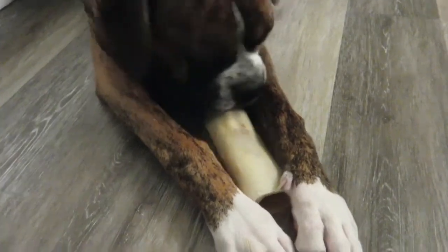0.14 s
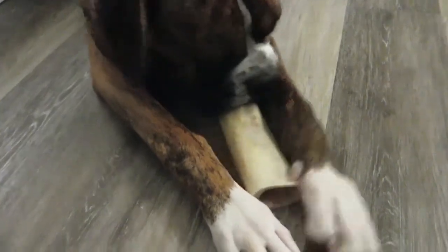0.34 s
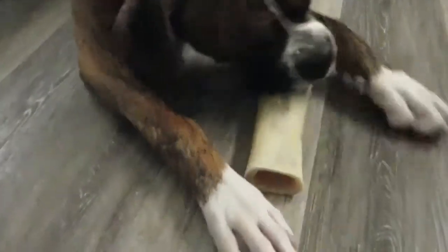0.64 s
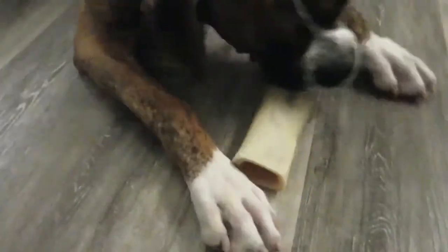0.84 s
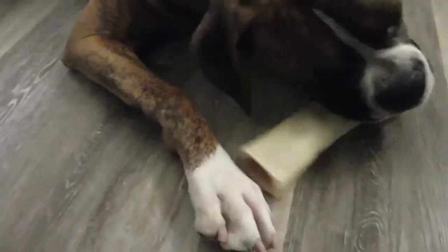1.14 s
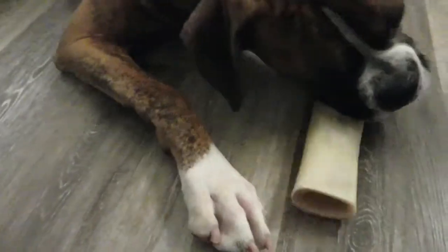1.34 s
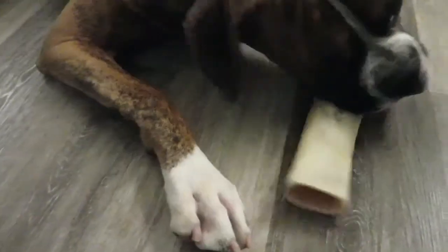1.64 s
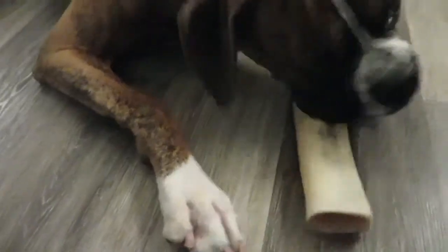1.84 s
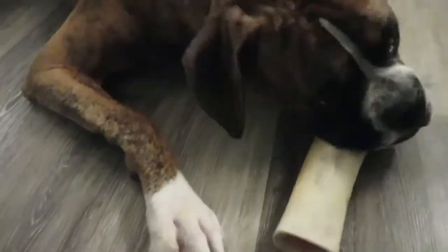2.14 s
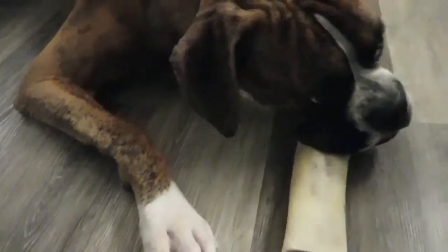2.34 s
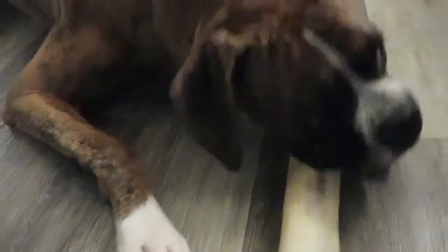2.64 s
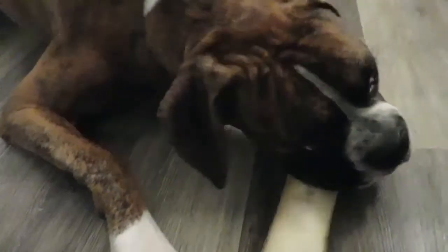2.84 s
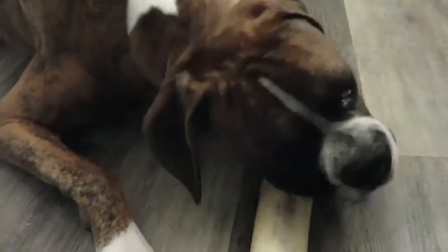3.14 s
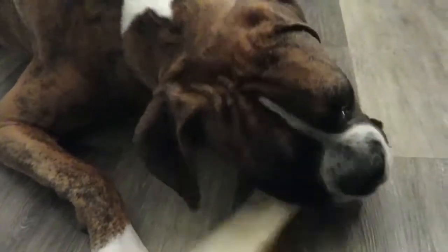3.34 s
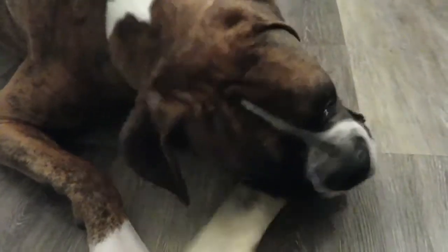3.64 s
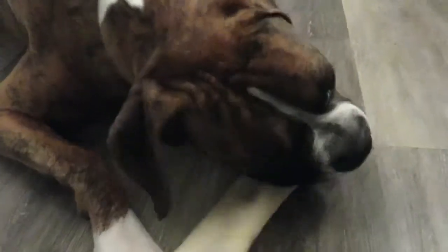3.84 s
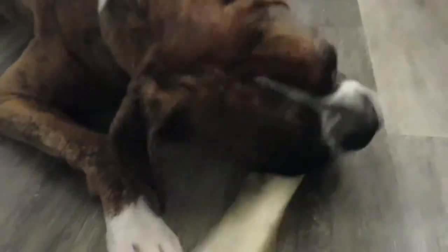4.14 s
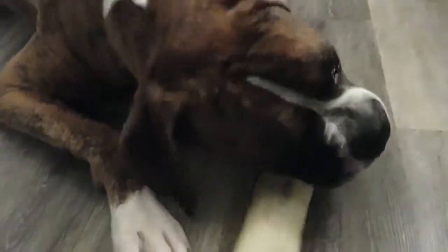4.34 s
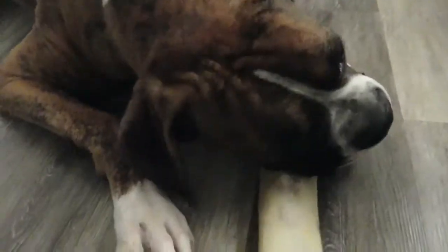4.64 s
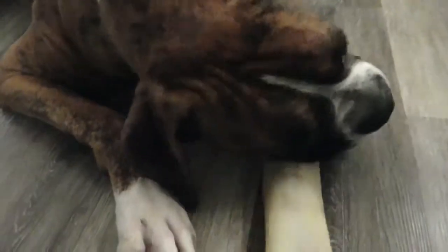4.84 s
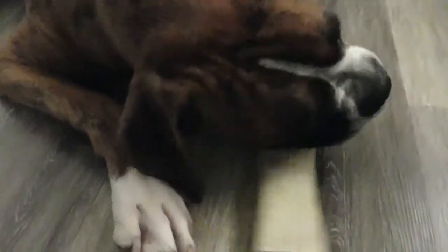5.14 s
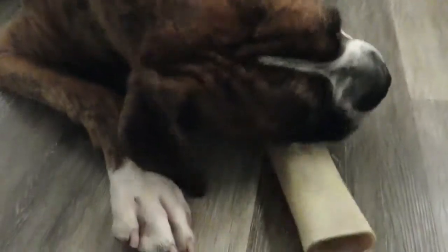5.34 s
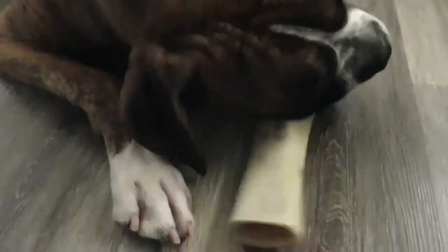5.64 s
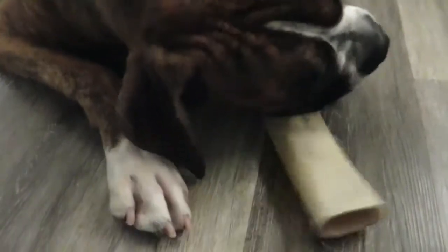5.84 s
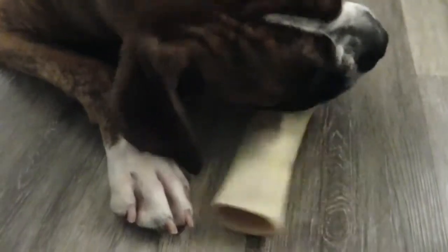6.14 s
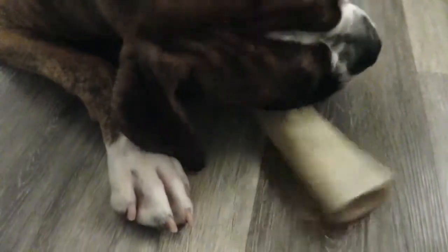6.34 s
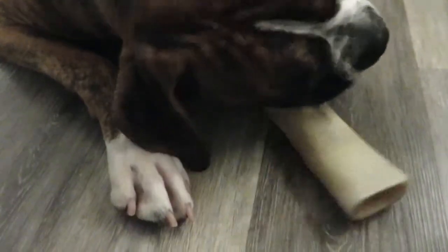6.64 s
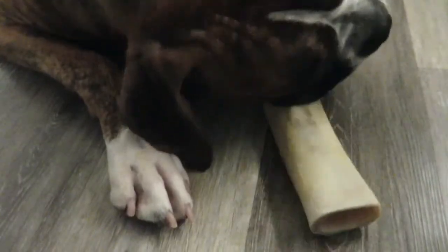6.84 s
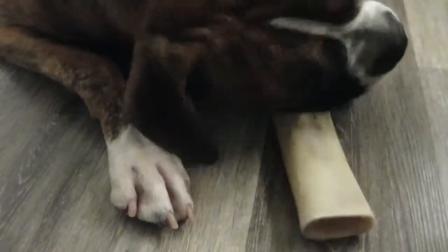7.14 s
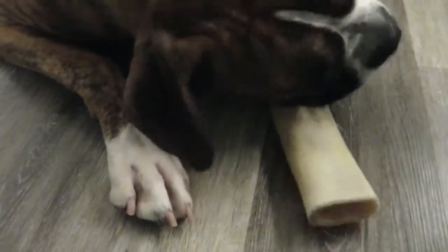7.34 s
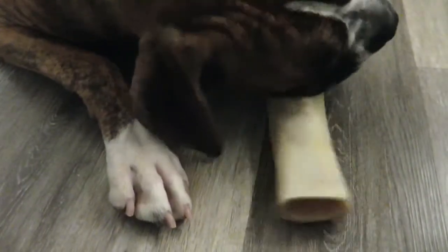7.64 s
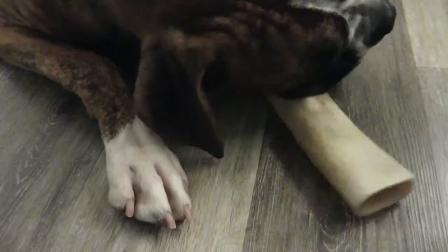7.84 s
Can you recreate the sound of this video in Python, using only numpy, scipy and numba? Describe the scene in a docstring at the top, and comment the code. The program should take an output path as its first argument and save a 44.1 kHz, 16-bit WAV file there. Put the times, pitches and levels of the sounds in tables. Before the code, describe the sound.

Irregular hollow bone knocks, sharp tooth clicks and short gritty skids as a dog chews, with faint floor thumps and soft room hiss.

```python
"""First a soft hum and hiss, a paw brushing and a low grind; at once a dog's teeth skid and knock on bone.
The place is a small room with a hard floor; the microphone is a phone with two ports, close to the bone.
Knocks make the hollow bone's air column hoot and the boards thump; cracks and snaps ring its wall.
Skids and grinding drive the same resonances with random slips. The room adds echoes and a short tail."""
import sys
import numpy as np
from scipy import signal
from scipy.io import wavfile
from scipy.ndimage import uniform_filter1d
from numba import njit

SR = 44100
rng = np.random.default_rng(int(sys.argv[2]) if len(sys.argv) > 2 else 0)


def transcribe(signal):
    """Save signal, clipped to [-1, 1], as a 16-bit WAV file at the path in sys.argv[1]."""
    frames = np.atleast_2d(signal).T
    limited = np.clip(frames, -1, 1)
    pcm = np.round(limited * 32767).astype(np.int16)
    wavfile.write(sys.argv[1], SR, pcm)


N = 351918
LEFT_RIGHT = np.array([[1], [-1]])  # sign of a side signal at the two ports


def undb(db):
    """dB to gain."""
    return 10 ** (np.asarray(db) / 20)


def unit(x):
    """Scale to rms 1."""
    return x / np.sqrt(np.mean(x ** 2))


def peak(x, db):
    """Scale to a peak level."""
    return x * undb(db) / np.abs(x).max()


def band(x, hz, width):
    """One fixed resonance, gain 1 at its centre."""
    return signal.lfilter(*signal.iirpeak(hz, hz / width, fs=SR), x)


def body(x, modes, tilt_db=0):
    """Sum of resonances with alternate signs; tilt_db shifts the level of each mode."""
    tilts = tilt_db + np.zeros(len(modes))
    total = 0
    for k, ((hz, width, db), tilt) in enumerate(zip(modes, tilts)):
        total = total + (-1) ** k * undb(db + tilt) * band(x, hz, width)
    return total


@njit
def svf(x, hz, width):
    """State-variable band-pass with a moving centre, gain 1 at the centre."""
    y, band_state, low_state = np.empty(len(x)), 0., 0.
    for i in range(len(x)):
        g, k = np.tan(np.pi * hz[i] / SR), width / hz[i]
        v = (band_state + g * (x[i] + 1e-18 - low_state)) / (1 + g * (g + k))
        band_state, low_state = 2 * v - band_state, low_state + 2 * g * v
        y[i] = k * v
    return y


@njit
def follow(x, attack, release):
    """Envelope with quick rise and slow fall; both are fractions per sample."""
    e, out = 0., np.empty(len(x))
    for i in range(len(x)):
        e += (x[i] - e) * (attack if x[i] > e else release)
        out[i] = e
    return out


def walk(rate):
    """Random levels held 1 / rate s and slewed; rms 1."""
    hold = int(SR / rate)
    steps = np.repeat(rng.standard_normal(N // hold + 1), hold)
    return unit(uniform_filter1d(steps, hold)[:N])


def curves(table):
    """Columns of a table after its times, drawn as straight lines sample by sample."""
    s, *columns = np.transpose(table)
    return [np.interp(np.arange(N) / SR, s, c) for c in columns]


def slips(rate, spread_db, patchy_db):
    """Stick-slip: random clicks of very uneven size that come in patches; rate is clicks per s."""
    hit = rng.random(N) < rate / SR
    uneven_db = spread_db * np.minimum(rng.exponential(size=N), 4)
    return hit * rng.standard_normal(N) * undb(uneven_db + patchy_db * walk(40))


# spectrum of the quiet place: (f/Hz, relative density level/dB)
AIR_SPECTRUM = [(15, -44), (25, -7), (97, 13.5), (141, -1.5), (363, -1.5), (489, -6), (676, -10),
                (1360, -3.5), (1600, -18), (3810, -11), (4250, -1.5), (11500, -44.5), (14300, -42),
                (16000, -51.5)]
# side level of the hum and hiss by band: (f/Hz, side minus mid level/dB)
AIR_SIDE_LEVEL = [(30, -18.5), (60, -20), (250, 8.5), (1500, -3), (4500, -29), (12000, -15)]
AIR_DB = -54.5  # rms level


def air():
    """House hum and microphone hiss: noise bands two thirds of an octave apart that waver a little."""
    def level_at(table, hz):
        f, db = np.transpose(table)
        return np.interp(np.log(hz), np.log(f), db)

    out, swell = 0, walk(1.564)
    for hz in 35 * 2 ** (np.arange(14) * 2 / 3):
        noise = rng.standard_normal((2, N))
        mid, side = band(band(noise, hz, hz * 0.68), hz, hz * 0.68)
        level = undb(level_at(AIR_SPECTRUM, hz) + 2.0 * swell + 0.78 * walk(6.4))
        out = out + level * (mid + undb(level_at(AIR_SIDE_LEVEL, hz)) * side * LEFT_RIGHT)
    return undb(AIR_DB) * unit(out)


# paw and fur brushing the floor, most as the paw sweeps round: (t/s, level/dB)
BRUSH_LEVEL = [(0, -76), (.75, -64.5), (1.3, -71), (1.55, -91), (1.9, -73), (4.25, -69), (4.5, -70.5),
               (7.98, -73)]


def brush():
    """Paw pads and fur sliding on the floor: many small slips make a wide soft hiss."""
    grains = np.array([slips(9000, spread_db=1.5, patchy_db=1.5) for _ in range(2)])
    mid, side = unit(band(band(grains, 6900, 11000), 7000, 10000))
    return undb(curves(BRUSH_LEVEL)[0]) * (mid + undb(-22.5) * side * LEFT_RIGHT)


# bone modes heard in a crack: (f/Hz, width/Hz, level/dB)
CRACK_MODES = [(1000, 257, 6), (1675, 350, 4.5), (2100, 302, 5), (2710, 654, 5), (3440, 1370, 0.5),
               (5640, 1260, -6.5)]
# ringing modes of the bone wall: (f/Hz, width/Hz, level/dB)
WALL_MODES = [(4201, 116, 7), (5336, 80, -4.5), (6500, 420, -5.5), (7600, 130, -11), (8260, 930, -11.5)]
# modes of the floor boards: (f/Hz, width/Hz, level/dB)
BOARD_MODES = [(92.4, 56, -3.5), (217.7, 116, 2), (394.6, 65, 6.5)]
# steady rubbing of teeth on bone and bone on floor:
# (t/s, grit level/dB, hollow level/dB, hollow f/Hz, floor rumble level/dB)
RUBBING = [(0.0, -56, -54.5, 820, -57), (0.31, -60.5, -56, 564, -63), (0.75, -56.5, -55, 615, -58),
           (1.3, -56.5, -53.5, 725, -53), (1.5, -56, -44, 760, -74), (1.85, -63, -58.5, 690, -57.5),
           (2.16, -54.5, -64, 600, -57), (2.63, -64, -74, 649, -62), (2.9, -54, -39, 633, -53.5),
           (3.25, -59, -70.5, 694, -66), (3.43, -55.5, -42, 663, -52.5), (4.1, -57, -48, 640, -45),
           (4.45, -56, -40, 623, -47), (4.75, -60.5, -65, 696, -64.5), (5.04, -57, -51.5, 692, -55.5),
           (5.5, -63.5, -55.5, 680, -54), (6.1, -55.5, -45, 770, -52), (6.7, -62.5, -61, 790, -55),
           (7.98, -63, -58, 690, -58.5)]
RUB_WALL_DB = -10.5  # wall ring relative to the grit


def grind():
    """Rubbing drives the wall, air column and floor boards with dense small slips."""
    grit_db, hollow_db, hollow_hz, rumble_db = curves(RUBBING)
    fine = slips(3000, spread_db=2.5, patchy_db=2.5)
    coarse = slips(600, spread_db=2.0, patchy_db=2.5)
    grit = unit(body(fine, CRACK_MODES))
    wall = unit(body(fine, WALL_MODES, tilt_db=np.array([-3.5, -7, 4.5, 0, -3.0])))
    hollow = unit(svf(svf(coarse, hollow_hz, 160.0), hollow_hz, 330.0))
    rumble = unit(body(coarse, BOARD_MODES))
    out = undb(grit_db) * (grit + undb(RUB_WALL_DB) * wall)
    return out + undb(hollow_db) * hollow + undb(rumble_db) * rumble


# a tooth skidding along the wall, rms levels before its swell and fade:
# (t/s, length/s, grit level/dB, hollow level/dB, wall ring level/dB, squeak f/Hz)
SKID_EVENTS = [(0.014, 0.046, -63, -48, -77, 6500), (0.44, 0.19, -49, -72, -57, 5370),
               (0.854, 0.22, -52, -83, -55, 5500), (1.126, 0.056, -39, -32.5, -46, 6660),
               (1.2, 0.12, -50, -50, -52, 5320), (1.362, .2, -60, -60, -68, 5300),
               (1.988, 0.051, -47.5, -48.5, -64, 6550), (2.571, 0.1, -54.5, -54, -58, 5070),
               (2.765, 0.044, -31, -56, -48, 6500), (2.917, 0.045, -52, -52, -43, 5450),
               (3, 0.039, -49, -64, -53, 5800), (3.434, 0.052, -52, -40, -44.5, 5150),
               (3.646, 0.063, -59, -42.5, -70, 6000), (3.723, 0.07, -51, -47, -52, 5330),
               (3.783, 0.07, -48, -36.5, -61, 6260), (4.048, .06, -50, -46, -53, 6250),
               (4.189, 0.074, -39, -40, -46, 7200), (4.317, 0.091, -37, -35, -45, 7250),
               (4.41, 0.062, -47, -38, -60, 5400), (4.549, 0.046, -33.5, -39, -45, 5650),
               (4.926, 0.052, -48, -51, -55, 6230), (5.002, 0.035, -44, -41, -43.5, 6100),
               (5.141, 0.038, -75, -41.5, -68, 6400), (5.294, 0.062, -59.5, -45.5, -68, 6240),
               (5.5, 0.12, -63, -40.5, -73, 5600), (5.599, 0.094, -44.5, -38, -59, 6370),
               (5.75, 0.051, -54, -34.5, -71, 5300), (5.796, 0.057, -54, -44.5, -63, 6300),
               (6.018, 0.077, -41, -38.5, -42.5, 6000), (6.354, 0.1, -57, -39, -50, 6130),
               (6.753, 0.19, -78, -51.5, -61, 6340), (7.079, 0.1, -67, -41, -63, 6300),
               (7.326, 0.044, -59, -45.5, -72, 6250), (7.521, 0.086, -74, -39, -57, 6600),
               (7.674, 0.053, -73, -50.5, -61, 6400), (7.842, 0.068, -72, -47, -55.5, 6300)]
# bites that knock the bone; hollow f/Hz is set by how far the jaws cover the end:
# (t/s, hollow peak level/dB, hollow f/Hz, floor thump peak level/dB, crack peak level/dB,
#  wall ring level above the crack/dB)
BITE_EVENTS = [(0.037, -32.5, 1070, -57, -54, -15), (0.188, -22, 545, -29.5, -53, -10),
               (0.462, -27.5, 1084, -37, -31.5, -34), (0.593, -29.5, 690, -40, -45, -15),
               (0.6827, -15, 693, -47, -32, -7), (0.72, -24.5, 637, -45, -39, -15),
               (0.767, -30, 688, -50, -55, -8), (0.903, -32, 726, -50, -55, -8),
               (0.917, -30, 710, -48, -48, -5), (0.995, -37.5, 685, -50, -41, -15),
               (1.1284, -7.5, 737, -30, -13.5, -7), (1.1891, -2, 792, -17, -13.5, -6.5),
               (1.255, -19.5, 727, -35, -42.5, -14), (1.3364, 0.5, 703, -49.5, -14.5, -3),
               (1.432, -26, 682, -64, -55, -9), (1.536, -32, 717, -52, -41, -12),
               (1.566, -5.5, 710, -40, -25.5, -5), (1.5725, -6.5, 674, -48, -43, -10),
               (1.686, -19, 640, -37.5, -38.5, -2), (1.8245, -34, 745, -57, -26, -12.5),
               (1.853, -35, 687, -41, -30, -13), (2.027, -23, 1222, -41, -33, -25),
               (2.1149, -17.5, 630, -40, -41, -7), (2.1385, 0, 630, -49, -16, -16.5),
               (2.233, -20, 646, -51, -44, -8), (2.349, -25.5, 606, -44, -48, -16),
               (2.751, -34, 1160, -57, -50, -6), (2.767, -3, 646, -20, -18, -2),
               (2.994, -30, 610, -31, -44, -15), (3.1282, -60, 1085, -46, -23, 1),
               (3.273, -14.5, 803, -25.5, -27, -7), (3.2956, -1.5, 685, -54, -13.5, -4.5),
               (3.36, -23, 685, -30, -35, -6), (3.528, -25.5, 600, -58, -26.5, -7),
               (3.62, -37, 556, -31.5, -57, -15), (3.702, -29, 690, -37, -54, -15),
               (3.727, -13.5, 703, -21.5, -24, -9), (3.8302, -18, 734, -35, -25, -13),
               (3.9248, -35, 540, -55, -25.5, -10.5), (4.078, -25.5, 740, -55, -46, -8),
               (4.124, -18.5, 743, -26.5, -31, -1), (4.177, -20, 725, -24.5, -31, -21),
               (4.28, -23.5, 717, -44, -45, -17), (4.296, -23.5, 790, -53, -45, -15),
               (4.324, -20.5, 840, -32, -21, -2), (4.3512, -28, 790, -39, -13, -13),
               (4.401, -18, 656, -41, -47, -15), (4.424, -15, 746, -22.5, -42, -10),
               (4.488, -28.5, 734, -38, -45, -17), (4.553, -20, 590, -21, -27, -2),
               (4.5622, -15.5, 712, -27, -20, -10), (4.864, -14, 790, -26, -32.5, -10),
               (4.9522, -24, 670, -26.5, -37, 5), (5.0075, -24.5, 760, -38, -32.5, -3),
               (5.121, -29.5, 720, -35, -53, -13), (5.497, -11, 772, -24, -26, 0),
               (5.499, -11, 1080, -37, -32, -18), (5.521, -18.5, 1040, -47, -49, -15),
               (5.7634, -22, 780, -27, -27, -7), (5.93, -23, 748, -33, -45, -7),
               (5.975, -23, 757, -28, -30.5, -14), (6.053, -18.5, 732, -31, -33, 5),
               (6.1904, -13.5, 942, -30, -28, -8.5), (6.369, -23, 853, -25.5, -47, -10),
               (6.5203, -31.5, 860, -31, -30.5, 2), (6.592, -30, 790, -36, -53, -15),
               (6.636, -32.5, 768, -50, -60, -15), (6.764, -39, 704, -36.5, -44, -4),
               (6.78, -37, 640, -29.5, -56, -17), (6.963, -31, 795, -48, -42, -10),
               (7.0974, -11, 810, -27.5, -28, -1), (7.128, -22.5, 910, -32, -48, -18),
               (7.218, -33.5, 660, -35.5, -27.5, -29), (7.4667, -29, 764, -27, -39, -4),
               (7.822, -28.5, 790, -32.5, -58, -10)]
SQUEAK_DB = -2.5  # relative to the wall ring
# every bite slides off into a short skid, its levels relative to the bite's own peaks
SLIDE_LAG_S, SLIDE_S, SLIDE_SQUEAK_HZ = 0.0026, 0.065, 5320
SLIDE_GRIT_DB, SLIDE_HOLLOW_DB, SLIDE_WALL_DB = -30.5, -34.5, -45.5


def skids(attack=0.22, squeak_width=900, hollow_width=260.0):
    """Dense uneven slips, swelling fast and fading, drive wall and air column and squeak."""
    rough = slips(2500, spread_db=1.0, patchy_db=7.0)
    grit, wall = body(rough, CRACK_MODES), body(rough, WALL_MODES)
    hollow, out = svf(rough, curves(RUBBING)[2], hollow_width), np.zeros(N)
    slides = [(s + SLIDE_LAG_S, SLIDE_S, crack_db + SLIDE_GRIT_DB, db + SLIDE_HOLLOW_DB,
               crack_db + wall_db + SLIDE_WALL_DB, SLIDE_SQUEAK_HZ)
              for s, db, _, _, crack_db, wall_db in BITE_EVENTS]
    for s, length, grit_db, hollow_db, wall_db, hz in SKID_EVENTS + slides:
        part = slice(int(s * SR), int((s + length) * SR))
        u = np.linspace(0, 1, len(out[part]))
        swell = np.sqrt(np.minimum(u / attack, (1 - u) / (1 - attack)))
        squeak = band(band(rough[part], hz, squeak_width), hz, 2 * squeak_width)
        levels = [grit_db, hollow_db, wall_db, wall_db + SQUEAK_DB]
        layers = [grit[part], hollow[part], wall[part], squeak]
        out[part] += swell * sum(undb(db) * unit(x) for db, x in zip(levels, layers))
    return out


# bone modes that every knock wakes: (f/Hz, level above the hollow/dB, t60/s)
UPPER_MODES = [(892, -21.5, 0.075), (1130, -18, 0.037), (1353, -36.5, 0.052)]
# the column starts just after the crack; covered further it sounds higher and dies sooner
HOLLOW_LAG_S = .0008
RING_S, RING_AT_HZ, RING_SLOPE = 0.033, 677, 2.5  # t60 at that pitch, and its power law


def knocks(rise_s=0.0023, push_s=0.00037, spread=0.11, near_db=-12.0):
    """The air column swells and dies with two weaker neighbours; the push goes on into the floor boards."""
    out, t = np.zeros(N + SR), np.arange(SR // 8) / SR
    thump = body(t * np.exp(-t / push_s), BOARD_MODES)
    upper = sum(undb(db - 60 * t / t60) * np.sin(2 * np.pi * hz * t) for hz, db, t60 in UPPER_MODES)
    for (s, db, hz, thump_db, *_), chance in zip(BITE_EVENTS, rng.random((len(BITE_EVENTS), 2))):
        ratios = 1 + spread * (.5 + chance) * [-1, 1.5]
        low, high = np.sin(2 * np.pi * hz * np.outer(ratios, t))
        tone = np.sin(2 * np.pi * hz * t) + undb(near_db) * (low + high)
        t60 = RING_S * (RING_AT_HZ / hz) ** RING_SLOPE
        hollow = (1 - np.exp(-t / rise_s)) * undb(-60 * t / t60) * tone
        i = int((s + HOLLOW_LAG_S) * SR)
        out[i:i + len(t)] += peak(hollow, db) + upper * undb(db) + peak(thump, thump_db)
    return out[:N]


# which tooth touches sets the pitch of the enamel tick: (from t/s, f/Hz)
TOOTH_PITCH = [(0, 5900), (.69, 6600), (1.8, 7650), (2.1, 6520), (3.1, 7500), (3.2, 6500), (3.9, 7600),
               (4.41, 6300)]


def tooth_hz(s):
    """Pitch of the tooth in use at time s."""
    return [hz for start, hz in TOOTH_PITCH if start <= s][-1]


# extra snaps of teeth on the wall, mostly without a knock:
# (t/s, crack peak level/dB, crack centre f/Hz, wall ring level above the crack/dB)
SNAP_EVENTS = [(0.1587, -45, 3120, 4), (0.274, -34.5, 3070, -35), (0.7015, -23, 2610, -15.5),
               (1.5722, -11.5, 1700, -13), (1.783, -37, 1330, -16), (1.997, -39, 1650, -7),
               (2.33, -33.5, 1750, -16), (2.9233, -43, 1310, 9), (3.001, -26.5, 2580, -31),
               (3.459, -37, 1560, 3), (3.6486, -31.5, 1730, -8), (3.8136, -30, 1360, -22),
               (4.023, -36, 1570, -8), (4.147, -29.5, 2130, -15), (4.169, -25, 1860, -19),
               (4.1854, -12.5, 2100, -41), (4.2206, -22, 2110, -33), (4.24, -34, 2100, -6),
               (4.2622, -25, 2100, -20), (4.385, -20, 2020, -7.5), (4.4298, -20.5, 1750, -13),
               (4.4553, -23.5, 1580, -27), (4.505, -24, 1700, -19), (4.6226, -25, 1580, -33),
               (4.79, -39, 3120, -4), (5.1925, -29, 2610, -30), (5.6162, -29, 1830, -17),
               (6.0316, -38, 1720, -4), (6.081, -22.5, 2080, -35), (6.3843, -29, 1500, -1),
               (7.335, -36, 1850, -23), (7.537, -34.5, 1370, 1.5), (7.605, -49, 2530, 13)]
BITE_CRACK_HZ = 1530
TICK_DB = -6.5  # relative to the wall ring


def clicks(snap_s=0.00005, scatter_db=2.5, tick_width=450, focus_db=-9):
    """A snap and some crumbling ring the wall; mode levels scatter at random around the crack centre."""
    out, t = np.zeros(N + SR), np.arange(SR // 20) / SR
    crumble_s, crumble_db = .005, -17.0
    bite_cracks = [(s, db, BITE_CRACK_HZ, wall_db) for s, *_, db, wall_db in BITE_EVENTS]
    for s, db, hz, wall_db in SNAP_EVENTS + bite_cracks:
        crumble = rng.standard_normal(len(t)) ** 3 * np.exp(-t / crumble_s) / 4
        burst = np.exp(-t / snap_s) + undb(crumble_db) * crumble
        scatter = scatter_db * rng.standard_normal((2, len(CRACK_MODES)))
        # modes fall by focus_db per octave away from the crack centre
        near = focus_db * np.abs(np.log2(np.array(CRACK_MODES)[:, 0] / hz))
        crack = peak(body(burst, CRACK_MODES, scatter[0] + near), 0)
        wall = peak(body(burst, WALL_MODES[:2], scatter[1, :2]), wall_db)
        tick = band(band(burst, tooth_hz(s), tick_width), tooth_hz(s), 2000)
        i = int(s * SR)
        out[i:i + len(t)] += undb(db) * (crack + wall + peak(tick, wall_db + TICK_DB))
    return out[:N]


# wall echoes: (t after the sound/s, level/dB)
WALL_ECHOES = [(.007, -21), (.016, -20.5), (.032, -16.5), (.04, -19), (.058, -27)]
# diffuse tail by band: (f/Hz, t60/s, level/dB)
ROOM_TAIL = [(162, 0.26, -19), (372, 0.43, -25.5), (760, 0.24, -17.5), (1910, 0.35, -13.5),
             (3570, 0.083, -16), (8800, 0.045, -9.5)]
# side level of the tail by band: (f/Hz, side minus mid level/dB)
ROOM_SIDE_LEVEL = [(150, -17), (400, -37), (800, -25), (1800, -34.5), (4000, -37.5), (9000, -15)]
ROOM_RISE_S = 0.0053


def room(dry, count=SR * 13 // 25):
    """A few wall echoes and a diffuse tail that dies band by band, drawn anew for every 0.52 s of bone."""
    t, out = np.arange(SR // 2) / SR, np.zeros((2, N + SR))
    for i in range(0, N, count):
        tail = np.zeros((2, len(t)))  # mid and side
        for (hz, t60, db), (_, side_db) in zip(ROOM_TAIL, ROOM_SIDE_LEVEL):
            shape = (1 - np.exp(-t / ROOM_RISE_S)) * undb(-60 * t / t60)
            noise = band(rng.standard_normal(tail.shape), hz, hz * 0.64) * undb([[db], [db + side_db]])
            tail += noise * shape / np.sqrt(hz / SR * np.sum(shape ** 2) * 3)
        for s, db in WALL_ECHOES:
            tail[0, int(s * SR)] += undb(db)
        wet = signal.fftconvolve(dry[None, i:i + count], tail, axes=1)
        out[:, i:i + wet.shape[1]] += wet
    return out[0, :N] + out[1, :N] * LEFT_RIGHT


# the boards are nearer the right port: (f/Hz, width/Hz, level/dB)
RIGHT_LEAN = (310, 250, -16.5)
SOFT_LOW_HZ, SOFT_HIGH_HZ = 71.6, 5730


def scene():
    """Bone, room, paws and air at the two ports."""
    # the microphone's colour softens the bone's treble and thins its bass
    soften = signal.butter(2, [SOFT_LOW_HZ, SOFT_HIGH_HZ], "band", fs=SR)
    bone = signal.lfilter(*soften, knocks() + clicks() + skids() + grind())
    lean = body(bone, [RIGHT_LEAN]) * -LEFT_RIGHT
    port_gain = undb(-0.1 * LEFT_RIGHT)
    return (bone + lean + room(bone)) * port_gain + brush() + air()


TOP_HZ = 15750


def record(dry):
    """Gain control ducks gently when the louder port's envelope passes -35.5 dB; the top is cut."""
    env = follow(np.abs(dry).max(axis=0), 0.003, 1 / (.06 * SR))
    gain = np.minimum(1, (undb(-35.5) / (env + 1e-9)) ** 0.15)
    top_cut = signal.ellip(10, .2, 70, TOP_HZ, fs=SR, output="sos")
    return signal.sosfilt(top_cut, dry * gain)


dry = scene()
out = record(dry)
transcribe(out)
```